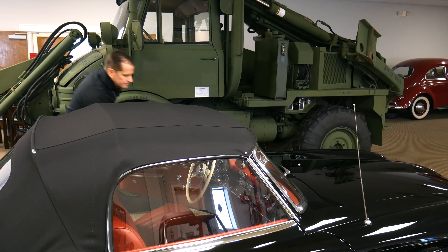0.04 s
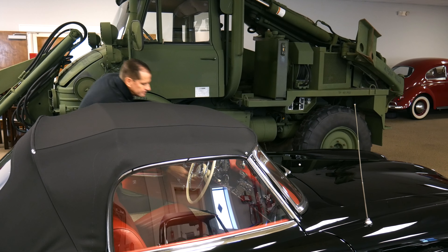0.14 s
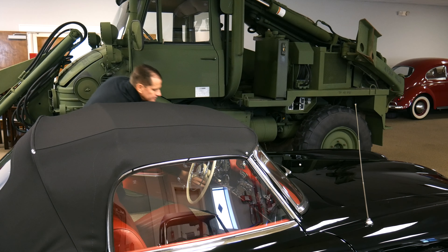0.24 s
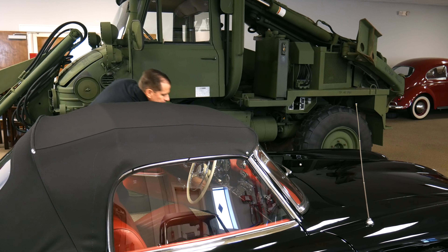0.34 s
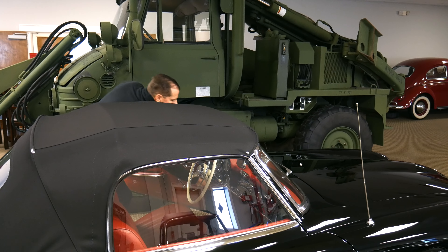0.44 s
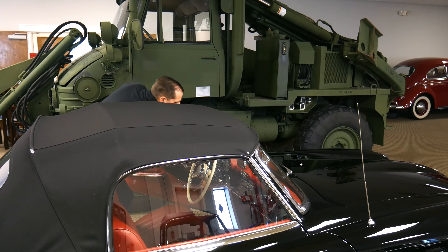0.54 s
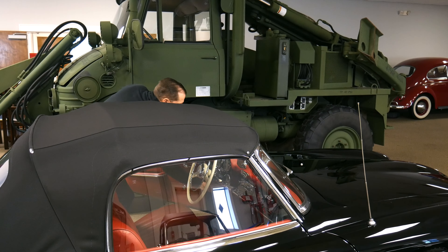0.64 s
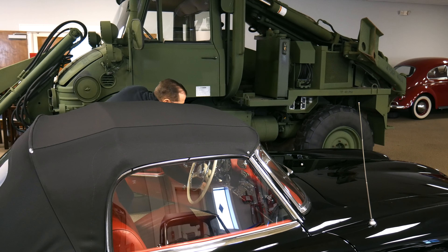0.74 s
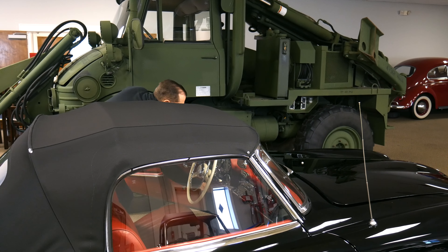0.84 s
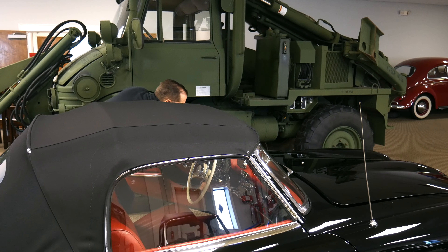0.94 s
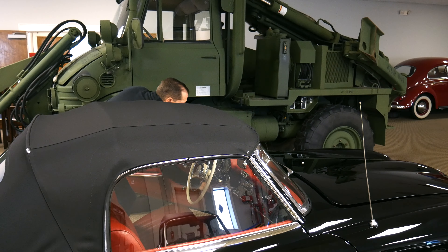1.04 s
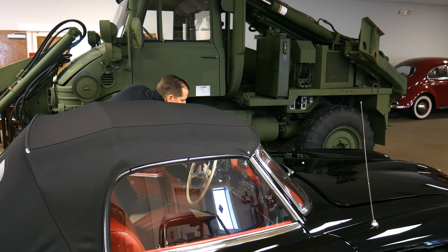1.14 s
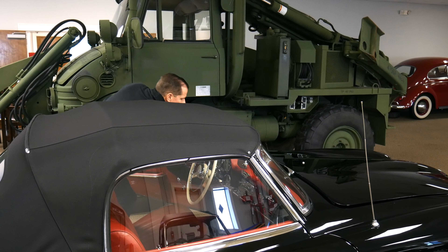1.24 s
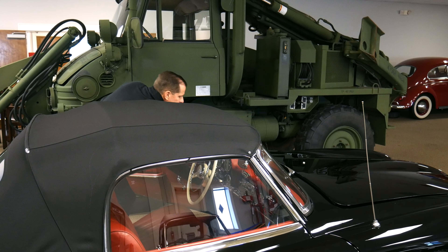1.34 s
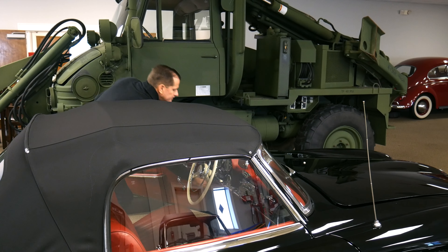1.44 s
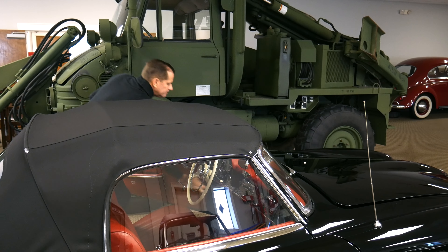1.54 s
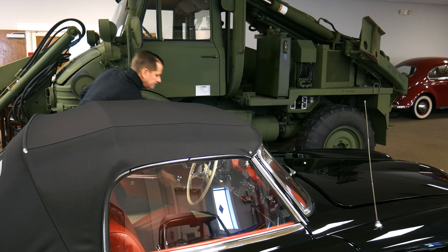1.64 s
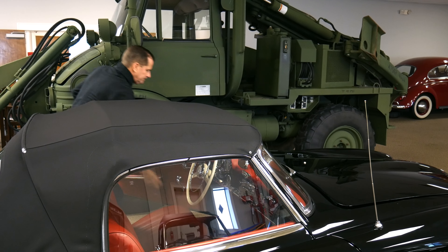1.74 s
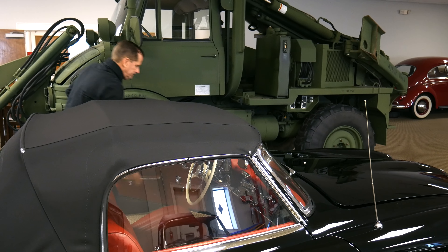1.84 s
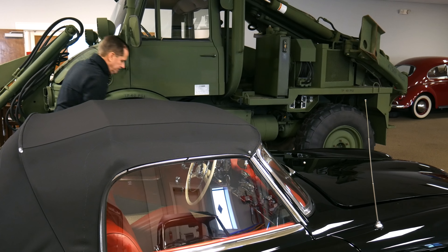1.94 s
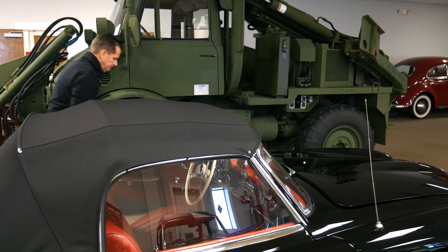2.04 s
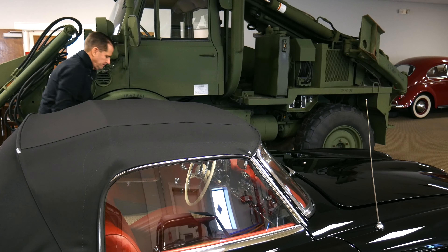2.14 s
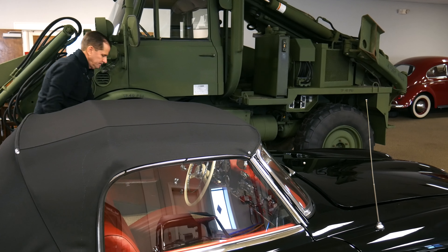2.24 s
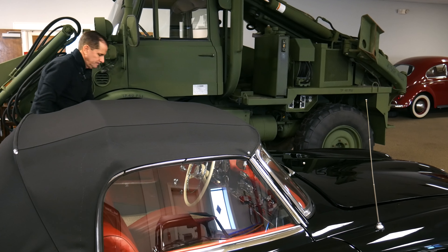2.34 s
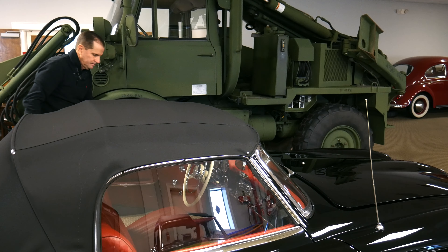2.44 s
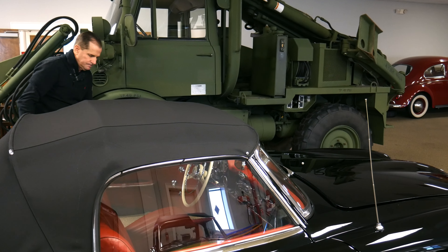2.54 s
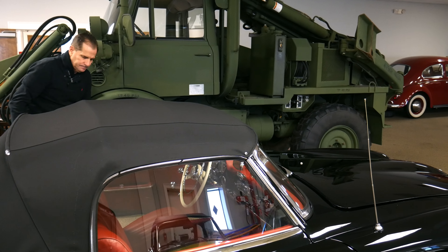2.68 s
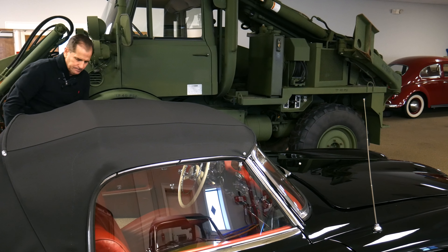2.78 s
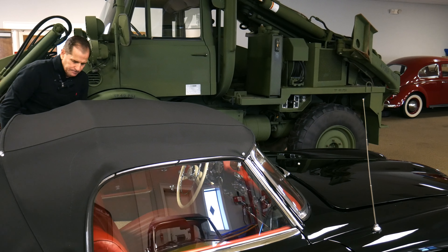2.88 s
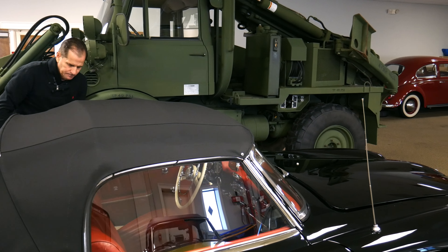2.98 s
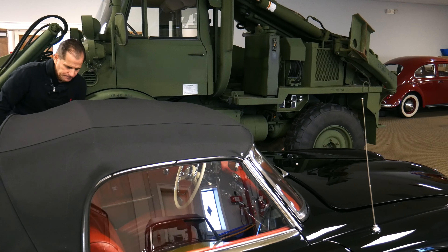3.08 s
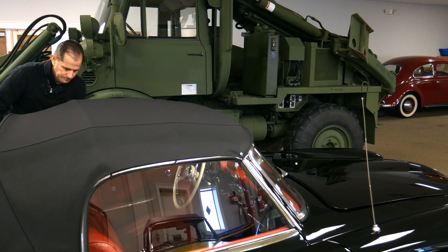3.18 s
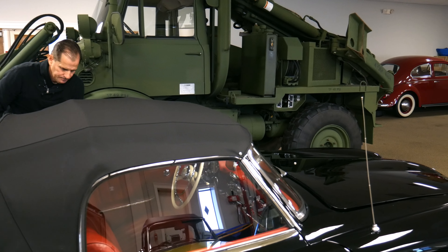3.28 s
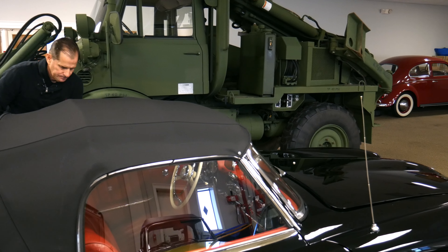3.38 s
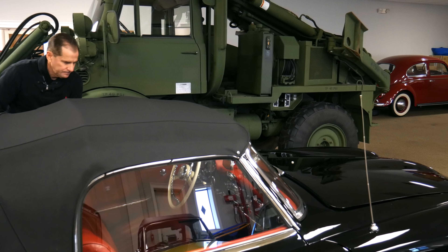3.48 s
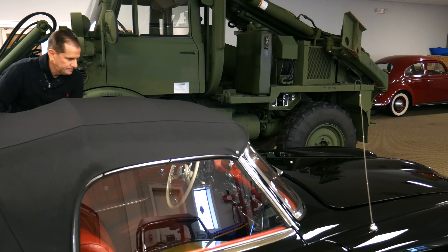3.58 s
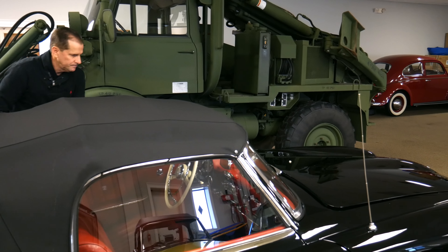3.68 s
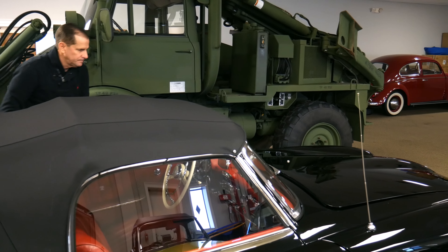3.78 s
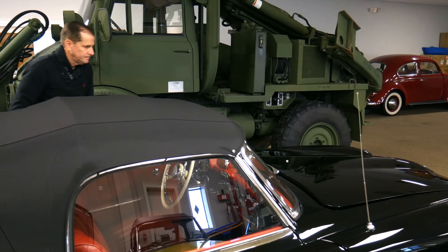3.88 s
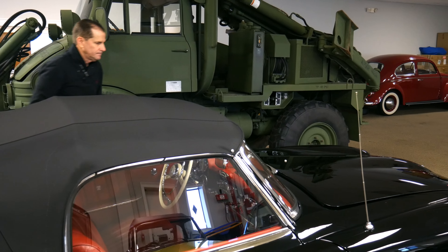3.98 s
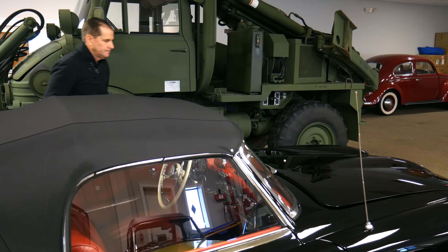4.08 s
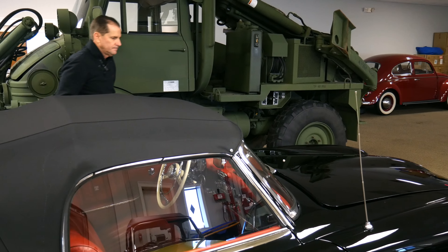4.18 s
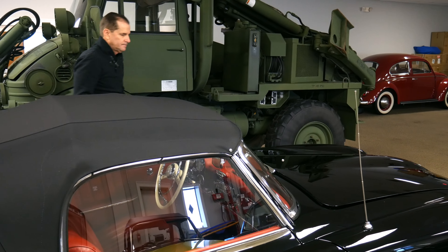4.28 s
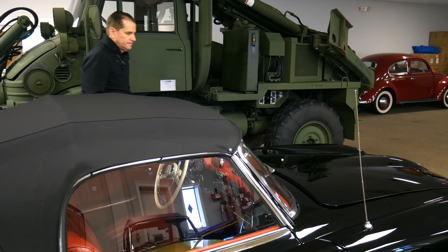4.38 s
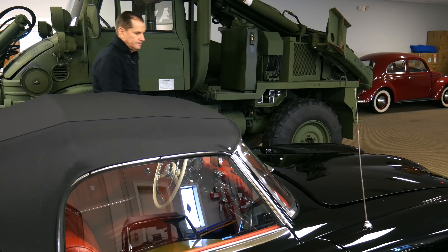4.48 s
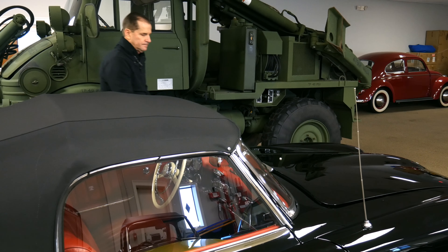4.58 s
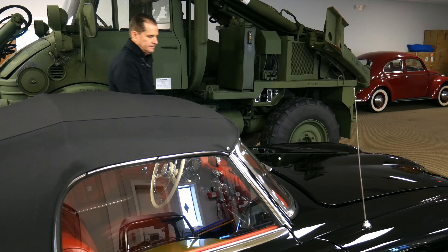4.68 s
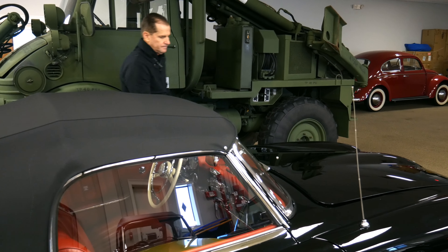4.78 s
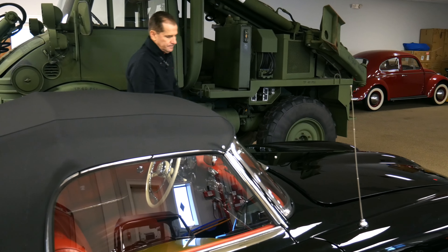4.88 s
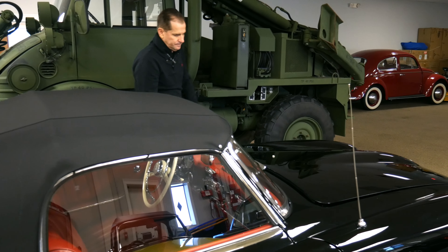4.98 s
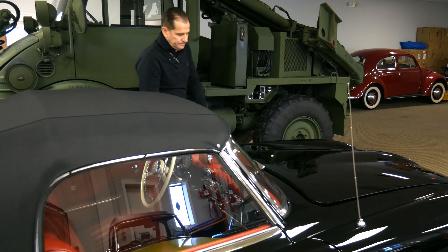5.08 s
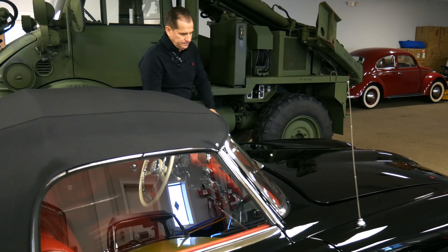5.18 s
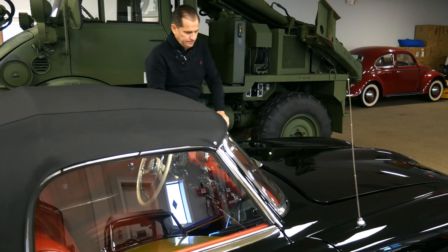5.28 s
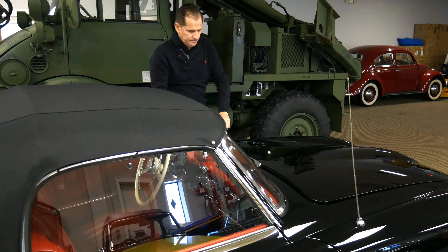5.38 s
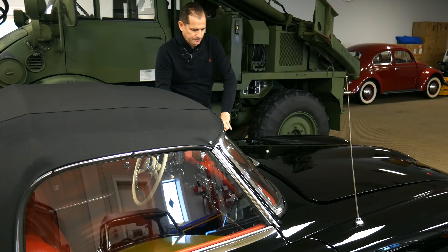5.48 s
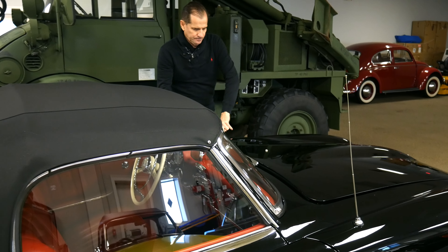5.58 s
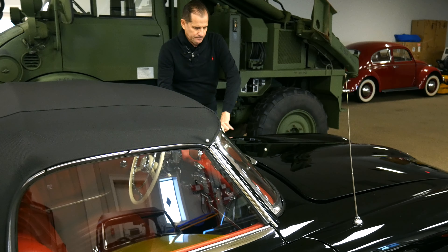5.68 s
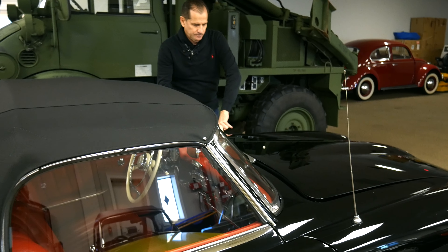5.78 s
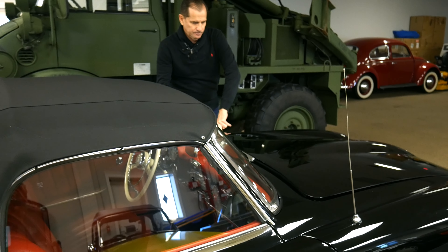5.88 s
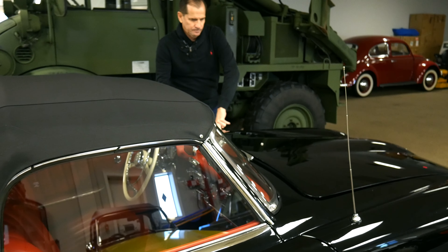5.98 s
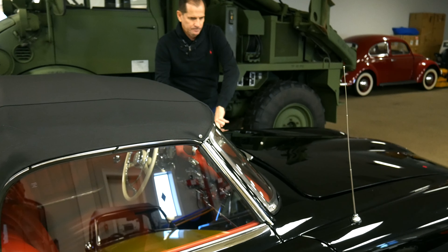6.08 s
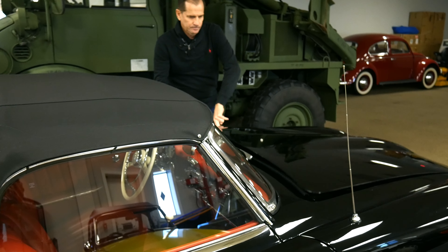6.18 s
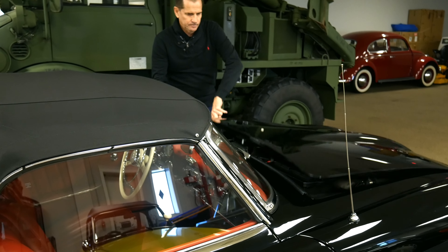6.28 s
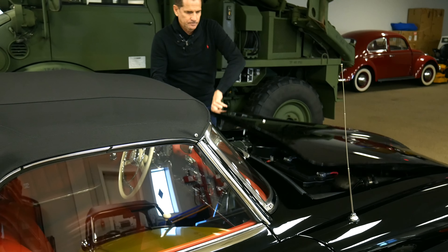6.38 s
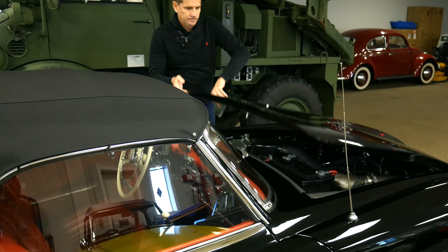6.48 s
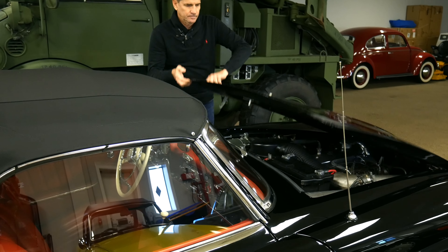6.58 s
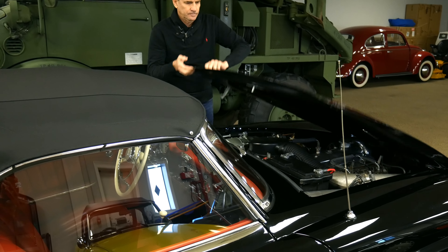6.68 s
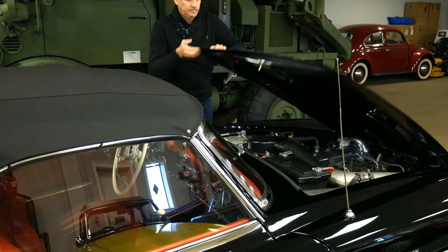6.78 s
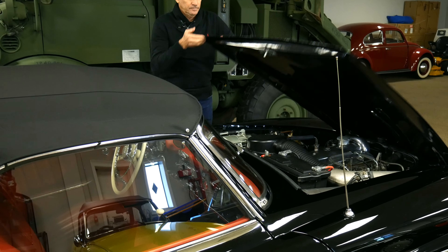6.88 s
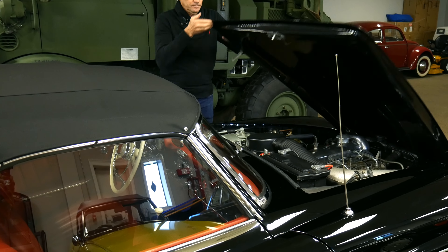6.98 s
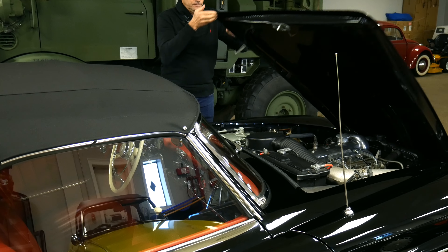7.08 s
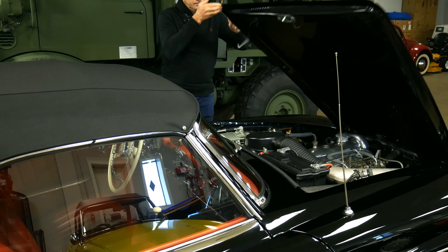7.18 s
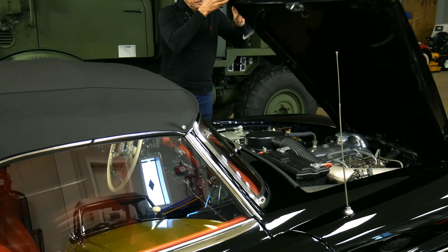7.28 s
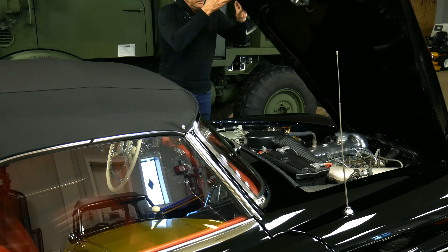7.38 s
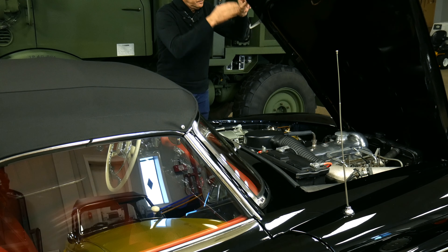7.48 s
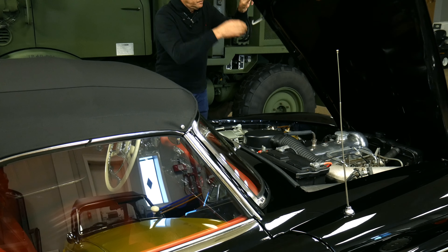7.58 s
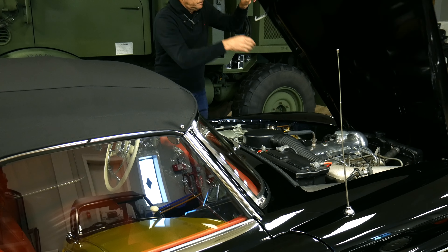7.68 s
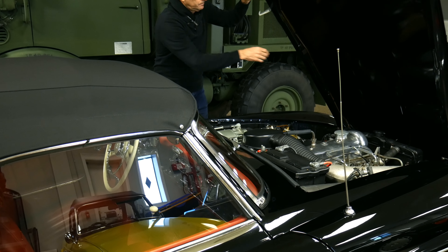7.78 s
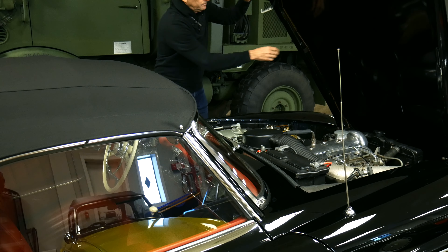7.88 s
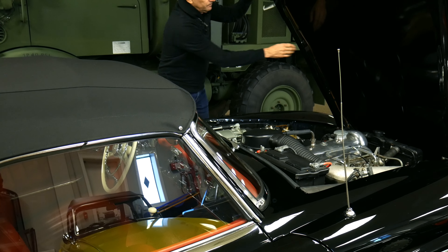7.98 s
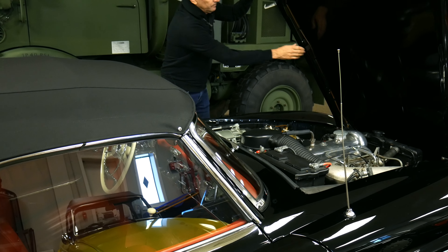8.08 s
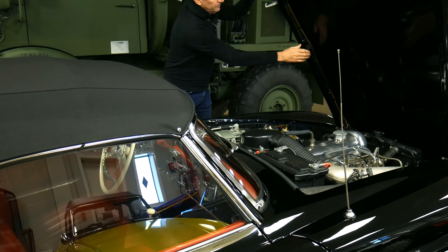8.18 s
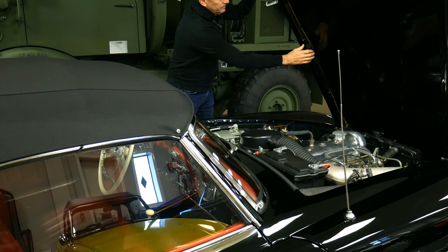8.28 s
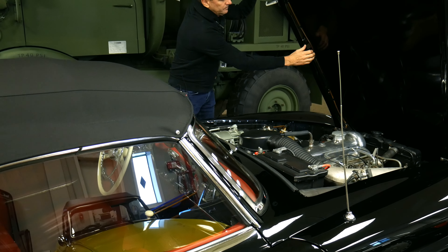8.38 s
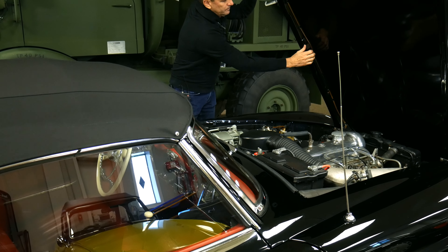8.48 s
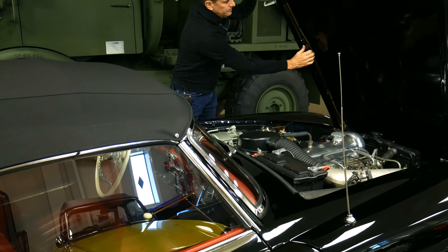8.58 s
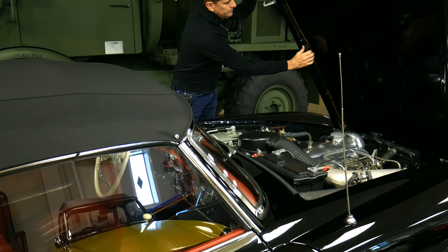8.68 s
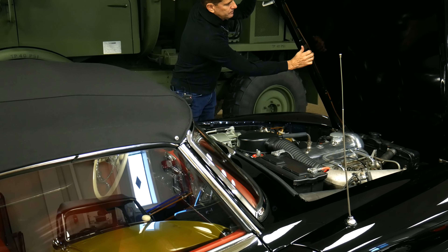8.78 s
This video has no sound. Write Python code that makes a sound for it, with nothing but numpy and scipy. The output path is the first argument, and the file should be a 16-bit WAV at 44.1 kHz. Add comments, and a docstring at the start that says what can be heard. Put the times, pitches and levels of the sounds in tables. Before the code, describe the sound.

Door handle clicks, hard door clunk, a heavy hood pop, then catch clank, squeaky hinges, groaning stay and a final metallic bang in a reverberant garage.

```python
"""Opening the hood of an old car

In a quiet, echoing garage a man opens the car door and pulls the hood release: a click, then a clunk.
He frees the safety catch and lifts the hood; its hinges groan and squeak until the stay locks with a bang.
Blows are noise bursts with ringing modes, rubbing is random slips that ring a body, squeaks are gliding tones.
Shoes and door thud and sleeves rustle over air noise and rumble; one microphone with a limiter hears it all."""
import sys
import numpy as np
from scipy import signal
from scipy.fft import rfft, irfft, next_fast_len
from scipy.io import wavfile
from scipy.ndimage import map_coordinates

SR = 44100
rng = np.random.default_rng(int(sys.argv[2]) if len(sys.argv) > 2 else 0)


def unload_wav(signal):
    """Save mono or channel-first audio to the path in sys.argv[1] as 16-bit WAV at rate SR, clipped to [-1, 1]."""
    wavfile.write(
        sys.argv[1],
        SR,
        np.round(np.clip(np.atleast_2d(signal).T, -1, 1) * 32767).astype(np.int16),
    )


N = 389623
TIME = np.arange(N) / SR  # s, whole scene
AGE = np.arange(2 * SR) / SR  # s since a blow

# Spectrum of light rubbing. Each row: frequency in Hz, relative level in dB.
RUB_TONE = [(150, -44), (600, 8), (2200, 1.5), (5000, -5.5), (8000, -9), (11000, -15), (15000, -45)]


def amp(db):
    """Decibels to gain."""
    return 10 ** (np.asarray(db) / 20)


def unit(x):
    """Scale to rms 1."""
    return x / np.sqrt(np.mean(x ** 2) + 1e-20)


def along(points, hz):
    """Read (Hz, value) points on a log frequency axis."""
    f, v = np.transpose(points)
    return np.interp(np.log(hz + 1), np.log(f + 1), v)


def coloured(x, tone, tilt_db_per_octave=0):
    """Causal minimum-phase filter of unit energy with the given spectrum and tilt."""
    size = 2 * next_fast_len(len(x) // 2 + 4096)
    hz = np.fft.rfftfreq(size, 1 / SR)
    level_db = np.maximum(along(tone, hz), -90)
    gain = amp(level_db + tilt_db_per_octave * np.log2(hz + 200))  # tilt flattens below 200 Hz
    cepstrum = irfft(np.log(unit(gain)))
    # fold onto positive time: minimum phase
    cepstrum[1:size // 2] *= 2
    cepstrum[size // 2 + 1:] = 0
    response = np.exp(rfft(cepstrum))
    return irfft(rfft(x, size) * response)[:len(x)]


def dying(t60s, stretch=1, tone=None):
    """Noise in which each frequency dies at its own speed; unit energy over the first 0.5 s."""
    hz, t, z = signal.stft(rng.standard_normal(len(AGE)), SR, nperseg=256)
    fall_db = -60 * t / (stretch * along(t60s, hz)[:, None])
    colour_db = along(tone, hz)[:, None] if tone else 0
    tail = signal.istft(z * amp(fall_db + colour_db), SR)[1][:len(AGE)]
    return tail / np.linalg.norm(tail[:SR // 2])


def in_garage(x, wet_db):
    """A sound plus the garage's reverberation, which builds with a 2.1 ms time constant."""
    # Decay of the garage. Each row: frequency in Hz, t60 in s.
    garage_t60 = [(50, 2.37), (150, 0.77), (420, 0.78), (1100, 0.67), (3000, 0.93), (8000, 0.61),
                  (15000, 0.11)]
    # Spectrum of the reverberation. Each row: frequency in Hz, relative level in dB.
    echo_tone = [(50, 4.5), (200, 5.5), (600, 0.5), (2000, -11), (8000, -14), (15000, 6)]
    tail = dying(garage_t60, tone=echo_tone) * (1 - np.exp(-AGE / 0.0021))
    return x + amp(wet_db) * signal.fftconvolve(x, tail)[:len(x)]


def wobble(knots_per_s):
    """Random curve over the life of a blow, linear between its knots."""
    knots = AGE * knots_per_s
    return map_coordinates(rng.standard_normal(int(knots[-1]) + 4), [knots], order=1)


def ringing(modes, wander_rad=0.38):
    """Damped modes of unit energy; their phases wander at random, which roughens the ring."""
    ring = np.zeros(len(AGE))
    for hz, db, t60_s in modes:
        level = amp(db + rng.normal(0, 1) - 60 * AGE / t60_s)
        phase = 2 * np.pi * (hz * AGE + rng.random()) + wander_rad * wobble(70)
        ring += level * np.sin(phase)
    ring = ring * (1 - np.exp(-AGE / 0.00087))
    return ring / np.linalg.norm(ring)


def strikes(contacts, tone, gain_db, stretch, wet_db, modes=(), modes_db=0,
            chatter_s=.01, chatter_db=0, rise_s=.001):
    """Each contact is a brief chatter of the faces, a dense ring and the part's clear modes."""
    # Decay of the dense ring before stretch. Each row: frequency in Hz, t60 in s.
    metal_t60 = [(60, 0.36), (300, 0.32), (1000, 0.28), (3000, 0.17), (8000, 0.088), (15000, 0.018)]
    out = np.zeros(N + len(AGE))
    for s, db, bright_db in contacts:
        chatter = rng.standard_normal(len(AGE)) * 1000 ** (-AGE / chatter_s)  # falls 60 dB in chatter_s
        force = dying(metal_t60, stretch) + amp(chatter_db) * chatter / np.linalg.norm(chatter)
        hit = coloured(force * (1 - np.exp(-AGE / rise_s)), tone, bright_db)
        hit = hit / np.linalg.norm(hit)
        if len(modes):
            hit = hit + amp(modes_db) * ringing(modes)
        out[round(s * SR):][:len(AGE)] += amp(db + gain_db) * in_garage(hit, wet_db)
    return out[:N]


def rebounds(blows, gap_s, loss_db, dull_db, count, slowing=1):
    """Each blow becomes count contacts, each weaker by loss_db and its tilt lowered by dull_db."""
    return [(s + gap_s * k ** slowing, db - loss_db * k, bright_db - dull_db * k)
            for s, db, bright_db in blows for k in range(count)]


def friction(tone, slips_per_s, spread_db):
    """Irregular slips of random size ring a body; rms 1."""
    hits = rng.random(N) < slips_per_s / SR
    slips = hits * rng.choice([-1, 1], N) * amp(spread_db * rng.standard_normal(N))
    return unit(coloured(slips, tone))


def strokes(rows, attack_s):
    """Gain of (start s, length s, dB) jerks: each rises in attack_s, then loses 20 dB per length."""
    power = np.zeros(N)
    for s, length_s, db in rows:
        age = np.maximum(TIME - s, 0)
        rise = np.minimum(age / attack_s, 1)
        fall = 10 ** (-np.maximum(age - attack_s, 0) / length_s)
        power += (amp(db) * rise * fall) ** 2
    return np.sqrt(power)


def swells(rows):
    """Gain of (middle s, length s, dB) smooth movements, each a bell."""
    power = np.zeros(N)
    for s, length_s, db in rows:
        power += amp(db) ** 2 * np.exp(-np.minimum((2 * (TIME - s) / length_s) ** 2, 20))
    return np.sqrt(power)


def door_latches():
    """The door's lock, then its check strap, snap and ring the door's modes."""
    # Lock and check strap contacts. Each row: time in s, level in dB before gain, tilt in dB per octave.
    lock_contacts = [(0.804, 0, -0.5), (0.811, -3, 0)]
    check_contacts = [(1.075, -15, -2), (1.112, 1, 0), (1.135, -9, -3)]
    # Spectra of their dense rings. Each row: frequency in Hz, relative level in dB.
    lock_tone = [(53, -30), (90, -6.5), (218, -4.5), (373, -19), (483, -12), (727, -9.5), (963, -7),
                 (1170, -15), (1690, -9), (3290, -19), (3660, -10), (4740, -15.5), (5630, -6), (7450, -8),
                 (15500, -27)]
    check_tone = [(65, -41), (110, -8.5), (181, -6), (531, -8.5), (770, -2.5), (1140, -10.5), (1960, -9),
                  (2170, -11.5), (2960, -9), (3870, -20), (5170, -10.5), (6630, -17.5), (7990, -7),
                  (10200, -17), (15500, -25)]
    # Clear modes of the door. Each row: frequency in Hz, relative level in dB, t60 in s.
    door_modes = [(213, 0, 0.32), (814, 3, 0.29), (1506, -6, 0.41), (2640, 7, 0.041), (3790, -14, .13),
                  (6000, 1, 0.16), (5880, 1, 0.19), (7140, -5, 0.091), (8000, 3, 0.091)]
    lock = strikes(lock_contacts, lock_tone, gain_db=13.5, stretch=0.85, wet_db=-10.0, modes=door_modes,
                   modes_db=-11.0, chatter_s=0.053, chatter_db=5.5, rise_s=0.0035)
    check = strikes(check_contacts, check_tone, gain_db=17.5, stretch=0.92, wet_db=-12.0, modes=door_modes,
                    modes_db=-21.0, chatter_s=0.061, chatter_db=-3.5, rise_s=0.00086)
    return lock + check


def hood_release():
    """The release clicks once and the sprung hood jumps up, each pop contact with one rebound."""
    # Release and pop contacts. Each row: time in s, level in dB before gain, tilt in dB per octave.
    release_contacts = [(3.083, -8.5, 1.5)]
    pop_contacts = [(3.141, 8, -2), (3.151, -3.5, 1.5), (3.16, 5, 0), (3.182, -11.5, 1.5), (3.237, -4, -21)]
    # Spectra of their dense rings. Each row: frequency in Hz, relative level in dB.
    release_tone = [(88, -54), (150, -4), (827, -11), (966, -9), (1730, -16), (2700, -8), (3620, -16),
                    (4140, -6.5), (5330, -12), (10500, -13), (15500, -28)]
    pop_tone = [(25, -49), (50, -7.5), (110, -5), (230, 0), (400, -6), (570, -8.5), (800, -15.5),
                (1100, -13), (1900, -20.5), (3000, -23), (6000, -24.5), (11500, -25.5), (15500, -36)]
    # Clear modes of release and hood. Each row: frequency in Hz, relative level in dB, t60 in s.
    release_modes = [(1001, -3, 0.088), (2590, -20, 0.1), (4030, -18, 0.055), (4770, 11, 0.021),
                     (11000, 1, 0.023)]
    pop_modes = [(105.7, -7.5, 0.38), (145.6, -12, 0.69), (209, -9, 0.13), (258, -4.5, 0.28),
                 (472, -2, 0.068), (586, 2.5, 0.049)]
    release = strikes(release_contacts, release_tone, gain_db=14.0, stretch=0.64, wet_db=-6.5,
                      modes=release_modes, modes_db=-6.5, chatter_s=0.012, chatter_db=3, rise_s=0.0022)
    jumps = rebounds(pop_contacts, gap_s=.0045, loss_db=4.0, dull_db=-0.9, count=2)
    pop = strikes(jumps, pop_tone, gain_db=20.0, stretch=0.54, wet_db=-14.5, modes=pop_modes,
                  modes_db=-5.5, chatter_s=0.021, chatter_db=0.5, rise_s=0.00025)
    return release + pop


def hood():
    """The safety catch lets go, the panel booms and slips off its hook, and the stay locks it open."""
    # Contacts of each part. Each row: time in s, level in dB before gain, tilt in dB per octave.
    catch_contacts = [(5.931, -2.5, 0)]
    hook_contacts = [(6.395, -11, 0), (6.403, -19, -2.5)]
    panel_contacts = [(6.054, -5.5, 1.5), (6.135, -11.5, 3), (6.26, -18, 2.5), (6.405, -5.5, 1.5),
                      (6.515, -18.5, -12), (7.186, -31.5, 7), (7.552, -33.5, 6.5), (7.685, -26.5, -10),
                      (7.8, -24.5, -20), (7.88, -32, 0)]
    stay_contacts = [(8.779, 0.5, -0.5), (8.795, -1.8, -3.5)]
    # Spectra of their dense rings. Each row: frequency in Hz, relative level in dB.
    catch_tone = [(59, -72), (100, -36), (270, -21), (340, -4.5), (487, -15.5), (564, -4.5), (825, -12.5),
                  (998, -11), (2040, -21), (2220, -19), (2810, -30), (3320, -20), (4960, -33.5),
                  (5870, -27.5), (15500, -36)]
    hook_tone = [(200, -21), (700, 0.5), (1150, -3.5), (1600, -0.5), (2500, -8), (4000, -17), (7000, -11.5),
                 (10000, -5.5), (13000, -12), (15500, -18)]
    panel_tone = [(40, -17), (90, -18), (145, -2.5), (210, -4.5), (350, -4), (550, -9.5), (800, -14.5),
                  (1150, -18.5), (1800, -32), (4000, -46), (15000, -53)]
    stay_tone = [(26, -30), (45, -15), (123, -5.5), (262, -17.5), (448, -2.5), (615, -17), (1000, -5.5),
                 (1110, -7), (1480, -22.5), (2090, -22), (2540, -26), (3090, -21), (4680, -24.5),
                 (7630, -19), (15500, -41.5)]
    # Their clear modes. Each row: frequency in Hz, relative level in dB, t60 in s.
    catch_modes = [(151.6, -10.5, 0.86), (327.7, -1.5, 0.32), (561.5, 0.5, 0.23), (650, -1, 0.17),
                   (996, 7, 0.086), (1219, -6, 0.26), (1587, -15, 0.19), (1840, -15, 0.23),
                   (2255, -14, 0.2), (3310, -3, 0.052), (3366, -4, 0.052)]
    panel_modes = [(122.6, -29, 0.64), (140.7, 5.5, 0.8), (208.4, 3, 0.6), (280, 1.5, 0.44),
                   (345.9, 6.5, 0.4), (405, -25, 0.15)]
    stay_modes = [(73, -1, 0.54), (96, 10, 1), (432, -28, 0.48), (964, 10, 0.27), (1080, -3, 0.34),
                  (1193, 3, 0.43)]
    catch = strikes(catch_contacts, catch_tone, gain_db=17, stretch=1.2, wet_db=-10, modes=catch_modes,
                    modes_db=2, chatter_s=.04, chatter_db=-2, rise_s=.0015)
    hook = strikes(hook_contacts, hook_tone, gain_db=16, stretch=1.12, wet_db=-10.5,
                   chatter_s=0.041, chatter_db=-3.5, rise_s=0.00069)
    flaps = rebounds(panel_contacts, gap_s=.011, loss_db=3.0, dull_db=3.0, count=3, slowing=1.7)
    panel = strikes(flaps, panel_tone, gain_db=15.5, stretch=1.0, wet_db=-17, modes=panel_modes,
                    modes_db=-0.5, chatter_s=0.028, chatter_db=2.5, rise_s=0.0027)
    stay = strikes(stay_contacts, stay_tone, gain_db=20.5, stretch=0.58, wet_db=-8.5, modes=stay_modes,
                   modes_db=-0.5, chatter_s=0.012, chatter_db=-1.5, rise_s=0.00068)
    return catch + hook + panel + stay


def door_rattle():
    """Loose parts inside the door shake after it hits its check strap."""
    # Rattling on the check strap. Each row: start in s, length in s, level in dB.
    rattles = [(1.125, 0.13, -23.5)]
    # Spectrum of the rattle. Each row: frequency in Hz, relative level in dB.
    rattle_tone = [(150, -21), (480, -2), (760, 5), (1150, -5), (1600, -17), (2800, -21), (5000, -30),
                   (8300, -19), (12000, -41)]
    rattle = strokes(rattles, attack_s=.012) * friction(rattle_tone, slips_per_s=600, spread_db=5)
    return in_garage(rattle, wet_db=-11)


def door_handle():
    """The handle scrapes in jerks and its bolt slides smoothly."""
    # Jerks of the handle. Each row: start in s, length in s, level in dB.
    handle_jerks = [(.415, 0.13, -43.5), (.572, 0.054, -26.5), (.727, 0.13, -30.5), (.775, 0.082, -25.5),
                    (1.068, 0.18, -27.5), (1.125, 0.14, -26)]
    # Slides of the bolt. Each row: middle in s, length in s, level in dB.
    bolt_slides = [(.875, .07, -41.5), (.99, 0.059, -39.5), (1.075, 0.019, -36), (1.2, 0.11, -49)]
    # Spectra of handle and bolt. Each row: frequency in Hz, relative level in dB.
    handle_tone = [(100, -20), (300, 0.5), (550, -0.5), (900, -3.5), (1500, -11.5), (3000, -24.5),
                   (8000, -29.5), (15000, -39)]
    bolt_tone = [(1000, -3), (2500, -8), (4200, -10), (5700, 1), (7400, -5), (9500, -12), (15000, -21)]
    handle = strokes(handle_jerks, attack_s=0.026) * friction(handle_tone, slips_per_s=1400, spread_db=-0.5)
    bolt = swells(bolt_slides) * friction(bolt_tone, slips_per_s=2000, spread_db=4)
    return in_garage(handle, wet_db=-9) + bolt


def lifting(start_s=6.62, end_s=7.98, start_db=-47.5, ease_db_per_s=10, ramp_s=0.058):
    """Gain of the hinges' steady creak, which eases as the hood swings up."""
    moving = np.clip(np.minimum(TIME - start_s, end_s - TIME) / ramp_s, 0, 1)
    return moving * amp(start_db - ease_db_per_s * (TIME - start_s))


def hinge_creak():
    """The hinges rub steadily during the lift, with added jerks."""
    # Jerks of the hinges. Each row: start in s, length in s, level in dB before the 3.5 dB gain.
    hinge_jerks = [(7.1, 0.047, -43.5), (7.18, 0.29, -43.5), (7.55, 0.1, -44.5), (7.665, 0.17, -47),
                   (7.868, 0.064, -41.5)]
    # Spectrum of the creak. Each row: frequency in Hz, relative level in dB.
    hinge_tone = [(60, -23), (160, -3), (330, -5), (520, 3), (780, 0), (1100, -6.5), (1600, -20),
                  (2500, -14), (5000, -38), (12000, -25)]
    motion = np.hypot(lifting(), strokes(hinge_jerks, attack_s=0.013))
    creak = amp(3.5) * motion * friction(hinge_tone, slips_per_s=900, spread_db=2.0)
    return in_garage(creak, wet_db=-9)


def hinge_rasps(start_s=6.69, period_s=0.1024, length_s=0.11, level_db=-48.5, count=5):
    """The hinge catches at an even rate as the hood starts to rise."""
    rasps = [(start_s + k * period_s, length_s, level_db) for k in range(count)]
    return strokes(rasps, attack_s=0.017) * friction(RUB_TONE, slips_per_s=1600, spread_db=-2)


def stay_slide(scrape_s=0.1):
    """The stay jerks along its guide: a low groan and a short bright scrape each time."""
    # Jerks of the stay. Each row: start in s, groan length in s, groan level in dB, scrape level in dB.
    slide_jerks = [(8.026, 0.22, -32.5, -42), (8.247, 0.24, -32, -45), (8.363, .25, -36, -55),
                   (8.501, 0.67, -29, -49.5), (8.642, 0.39, -23, -43)]
    # Spectrum of the groan. Each row: frequency in Hz, relative level in dB.
    groan_tone = [(50, -14.5), (130, 2), (220, -12.5), (350, -4), (480, 1.5), (730, -5), (1050, -12.5),
                  (1600, -22.5), (3000, -30), (12000, -50)]
    push = strokes([(s, length_s, db) for s, length_s, db, _ in slide_jerks], attack_s=0.031)
    groan = push * friction(groan_tone, slips_per_s=1400, spread_db=0)
    graze = strokes([(s, scrape_s, db) for s, _, _, db in slide_jerks], attack_s=.03)
    scrape = graze * friction(RUB_TONE, slips_per_s=3600, spread_db=-2.5)
    return in_garage(groan, wet_db=-9) + scrape


def squeaks(waver=0.069, length_s=.036, glide_share=-0.038, overtone_fall_db=-22):
    """Where metal slips regularly it sings a short, unsteady note with two overtones."""
    # Hinge squeaks. Each row: middle in s, pitch in Hz, level in dB.
    hinge_notes = [(6.766, 765, -41.5), (6.845, 747, -44), (7.265, 740, -36), (7.375, 716, -32.5),
                   (7.429, 730, -38.5), (7.481, 716, -40), (7.582, 740, -41), (7.695, 723, -34),
                   (7.823, 710, -42.5)]
    # Stay just before it locks: middle in s, length in s, pitch in Hz, glide share, level in dB,
    # change per overtone in dB.
    stay_squeal = (8.768, .024, 2150, 0.5, -22, -7.5)
    out = np.zeros(N)
    notes = [(s, length_s, hz, glide_share, db, overtone_fall_db) for s, hz, db in hinge_notes]
    for s, note_s, hz, glide, db, fall_db in notes + [stay_squeal]:
        u = np.linspace(-.5, .5, round(note_s * SR))
        jitter = waver * wobble(hz)[:len(u)]  # about one knot per cycle: cycle lengths vary
        phase = 2 * np.pi * np.cumsum(hz * (1 + glide * u + jitter)) / SR
        note = sum(amp(k * fall_db) * np.sin((k + 1) * phase) for k in range(3))
        out[round((s - note_s / 2) * SR):][:len(u)] += amp(db) * np.cos(np.pi * u) * note
    return in_garage(out, wet_db=-17)


def loose_ticks():
    """Light impacts of loose metal, each a brief dense ring."""
    # Ticks. Each row: time in s, level in dB before gain.
    tick_contacts = [(0.2797, -27.5), (.593, -31), (0.5077, -34), (0.9431, -32), (1.2348, -26),
                     (1.322, -38), (1.3644, -35.5), (4.9117, -37.5), (7.1842, -42), (7.5508, -42),
                     (8.66, -30.5), (8.6897, -32.5)]
    # Spectrum of a tick. Each row: frequency in Hz, relative level in dB.
    tick_tone = [(100, -20), (500, 2.5), (1500, -7.5), (3000, -6.5), (7000, -14.5), (15000, -18)]
    return strikes([(s, db, 0) for s, db in tick_contacts], tick_tone, gain_db=20.5, stretch=0.22,
                   wet_db=-12.5, chatter_s=0.031, chatter_db=-8.5, rise_s=0.00041)


def shoes_and_door_thuds():
    """Soft double thuds of shoes and of the door, and a sole rubbing the floor."""
    # Shoe and door thuds. Each row: time in s, level in dB before gain, tilt in dB per octave.
    thud_contacts = [(.219, -16.5, -6), (.288, -21.5, 2.5), (.613, -16, 4.5), (.757, -14.5, -21),
                     (.835, -14.5, -4), (1.729, -32.5, 6.5), (1.803, -24, -18), (5.184, -24, 1.5),
                     (8.172, -19, -25), (8.29, -22, -13)]
    # Sliding sole. Each row: middle in s, length in s, level in dB.
    sole_slides = [(.2, 0.095, -37.5), (5.192, 0.052, -37.5), (5.42, 0.25, -44), (5.81, 0.057, -46.5)]
    # Spectra of thud and sole. Each row: frequency in Hz, relative level in dB.
    thud_tone = [(20, -31), (50, -1), (170, 0.5), (300, -2), (600, -18.5), (1500, -35.5), (6000, -65),
                 (15000, -65)]
    sole_tone = [(80, -12), (160, 2.5), (280, 0), (450, -4.5), (800, -4.5), (1100, -10.5), (2000, -19),
                 (5000, -25), (15000, -35)]
    double_thuds = rebounds(thud_contacts, gap_s=.04, loss_db=11, dull_db=0.0, count=2)
    thuds = strikes(double_thuds, thud_tone, gain_db=21.0, stretch=0.96, wet_db=-16.0,
                    chatter_s=0.036, chatter_db=7.5, rise_s=0.00087)
    low_rub = friction(sole_tone, slips_per_s=1400, spread_db=1.5)
    bright_rub = amp(-11) * friction(RUB_TONE, slips_per_s=3100, spread_db=0)
    return thuds + swells(sole_slides) * (low_rub + bright_rub)


def sleeves():
    """Moving cloth rubs, and swishes in the treble, through many small slips."""
    # Movements. Each row: middle in s, length in s, rub level in dB before the -0.5 dB gain, swish level in dB.
    cloth_moves = [(0.156, 0.53, -48.5, -46.5), (1.341, 0.085, -48.5, -47), (1.57, 0.24, -53.5, -51),
                   (1.863, 0.38, -55.5, -56.5), (2.43, 0.071, -56.5, -64), (3.033, 0.12, -57, -59),
                   (3.435, 0.13, -48, -75), (3.97, 0.36, -53, -57), (4.118, 0.019, -50, -68),
                   (4.627, 0.56, -54.5, -59.5), (5.453, 0.15, -49.5, -55), (7.163, 0.44, -50.5, -54.5),
                   (7.67, .2, -53, -56), (7.978, 0.33, -53.5, -51), (8.5, 0.94, -65, -56)]
    # Spectrum of the swish. Each row: frequency in Hz, relative level in dB.
    swish_tone = [(4000, -6), (8000, -8), (13000, -3), (16000, -9)]
    rub = swells([(s, length_s, db) for s, length_s, db, _ in cloth_moves])
    swish = swells([(s, length_s, db) for s, length_s, _, db in cloth_moves])
    rubbing = amp(-0.5) * rub * friction(RUB_TONE, slips_per_s=2800, spread_db=0.5)
    return rubbing + swish * friction(swish_tone, slips_per_s=19000, spread_db=4.0)


def background(air_db=-48.5, rumble_db=-50.5):
    """Steady air noise and low rumble; the rumble swells as the garage booms after heavy blows."""
    # Booms. Each row: start in s, level in dB.
    boom_blows = [(.8, -35), (1.112, -52), (3.2, -31), (6.06, -34), (6.41, -40.5)]
    # Spectra of air and rumble. Each row: frequency in Hz, relative level in dB.
    air_tone = [(12, -38), (20, -30), (44, -4.5), (76, -5), (153, -28), (268, -15.5), (317, -14.5),
                (539, -20), (916, -26), (1510, -30.5), (1740, -32), (11300, -36), (15800, -38)]
    rumble_tone = [(20, -36.5), (50, -12), (100, 1.5), (160, -5), (300, -13.5), (1000, -50)]
    air = amp(air_db) * unit(coloured(rng.standard_normal(N), air_tone))
    boom = strokes([(s, 0.98, db) for s, db in boom_blows], attack_s=0.013)
    rumble = unit(coloured(rng.standard_normal(N), rumble_tone))
    return air + np.hypot(amp(rumble_db), boom) * rumble


def scene():
    """Sum all sources; one microphone feeds both channels."""
    car = door_latches() + hood_release() + hood() + door_rattle() + door_handle()
    lift = hinge_creak() + hinge_rasps() + stay_slide() + squeaks() + loose_ticks()
    mono = car + lift + shoes_and_door_thuds() + sleeves() + background()
    return np.array([mono, mono])


def record(dry, limit_db=-4, recovery_db_per_s=28, attack_s=0.0052, top_hz=15900):
    """The limiter ducks after loud peaks and recovers steadily; what slips through clips; the top is cut."""
    excess_db = np.maximum(20 * np.log10(np.abs(dry[0]) + 1e-9) - limit_db, 0)
    recovered_db = recovery_db_per_s * TIME
    duck_db = np.maximum.accumulate(excess_db + recovered_db) - recovered_db
    keep = np.exp(-1 / (attack_s * SR))
    smooth_duck_db = signal.lfilter([1 - keep], [1, -keep], duck_db)
    limited = np.clip(dry * amp(-smooth_duck_db), -1, 1)
    size = next_fast_len(N + SR)
    passed = np.fft.rfftfreq(size, 1 / SR) < top_hz
    return irfft(rfft(limited, size) * passed, size)[:, :N]


dry = scene()
out = record(dry)
unload_wav(out)
```